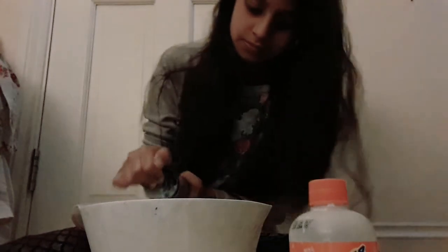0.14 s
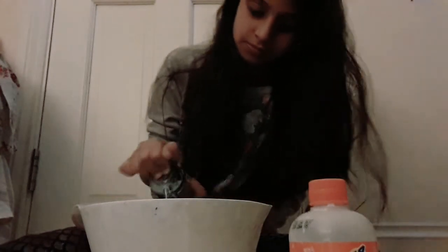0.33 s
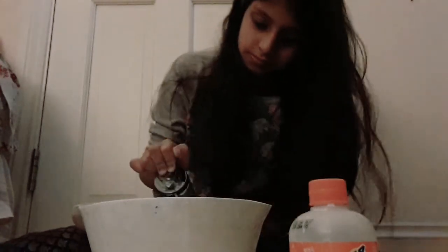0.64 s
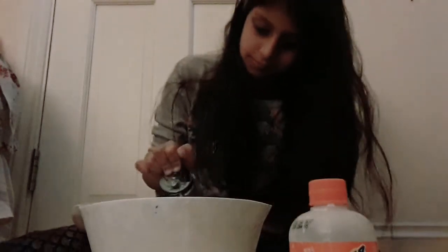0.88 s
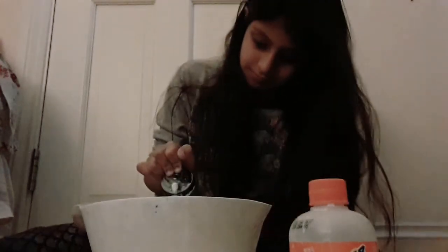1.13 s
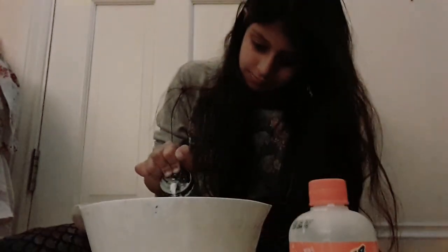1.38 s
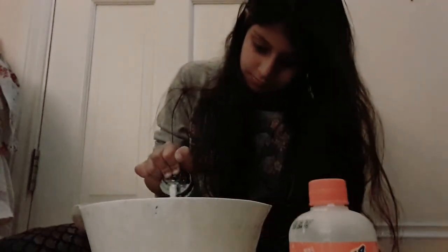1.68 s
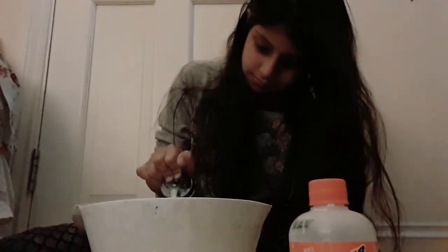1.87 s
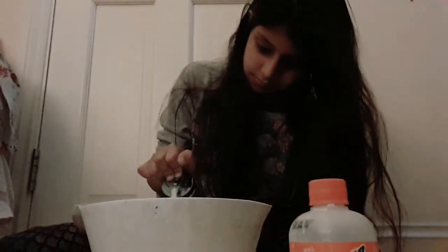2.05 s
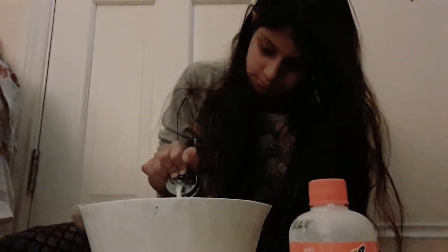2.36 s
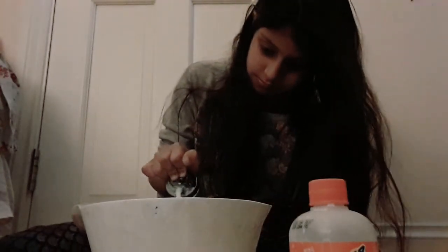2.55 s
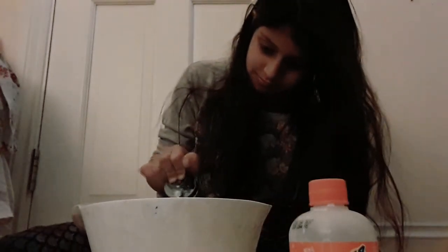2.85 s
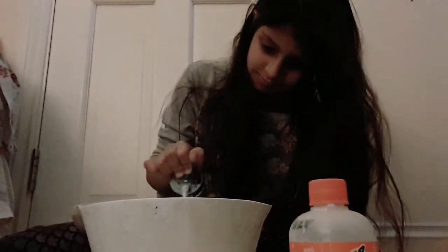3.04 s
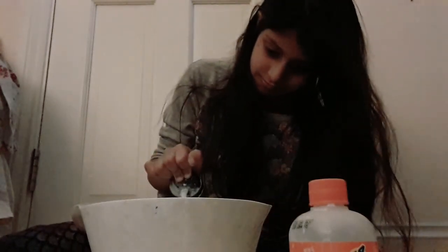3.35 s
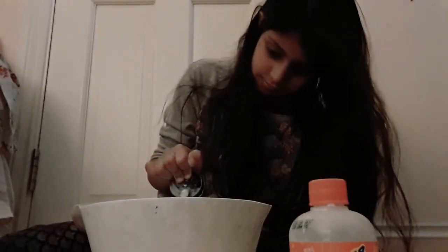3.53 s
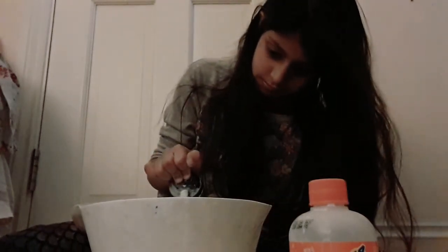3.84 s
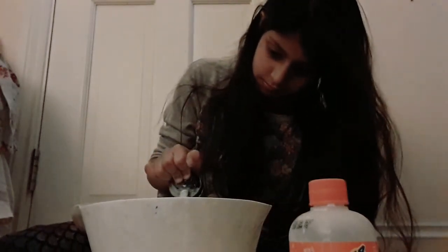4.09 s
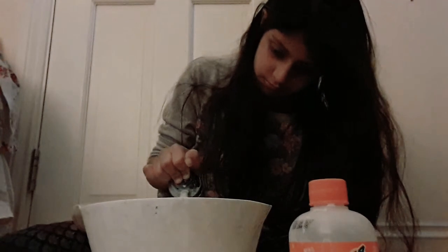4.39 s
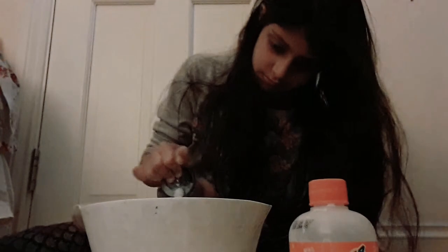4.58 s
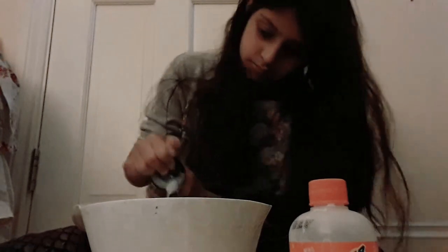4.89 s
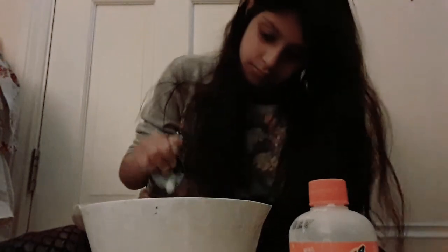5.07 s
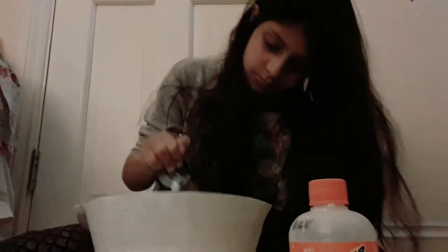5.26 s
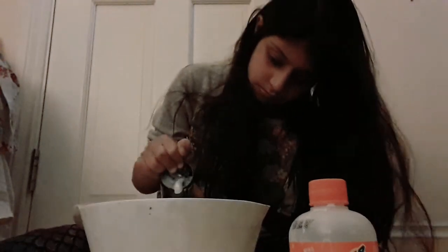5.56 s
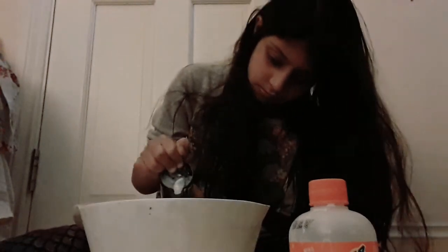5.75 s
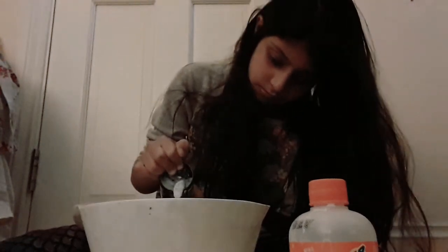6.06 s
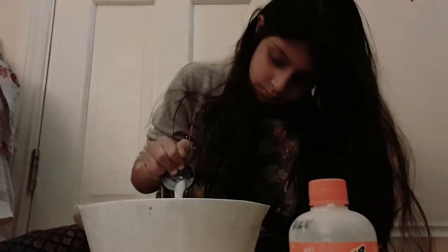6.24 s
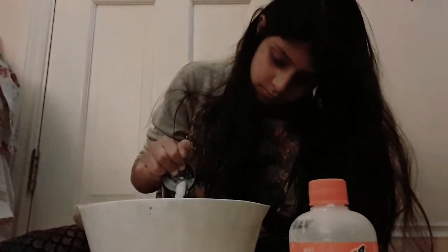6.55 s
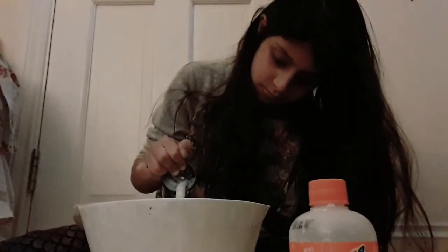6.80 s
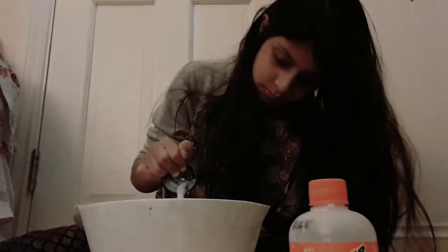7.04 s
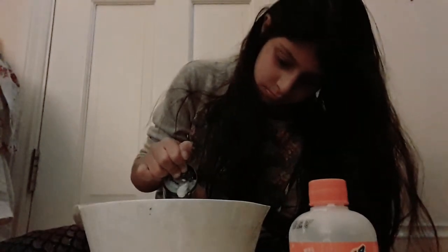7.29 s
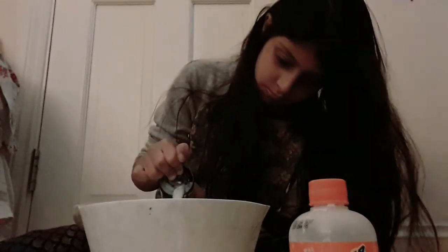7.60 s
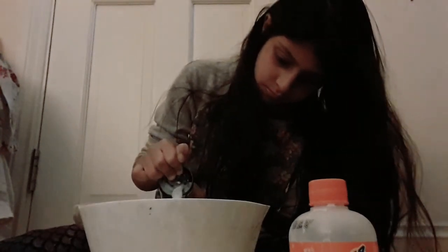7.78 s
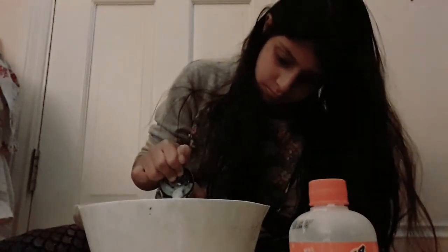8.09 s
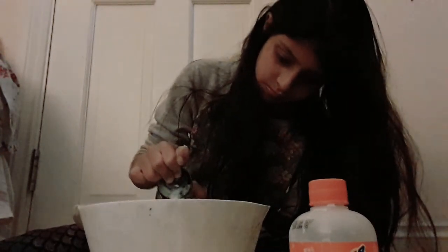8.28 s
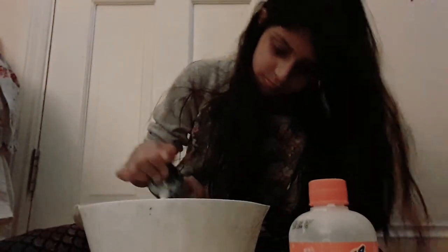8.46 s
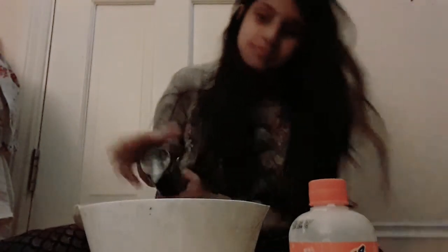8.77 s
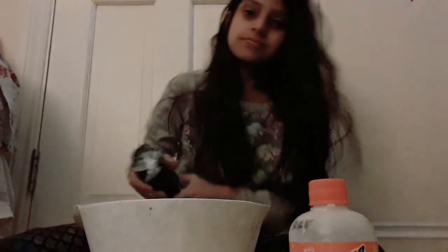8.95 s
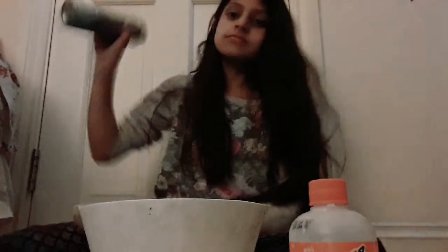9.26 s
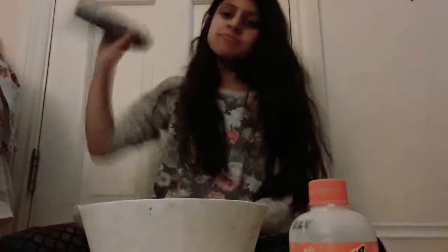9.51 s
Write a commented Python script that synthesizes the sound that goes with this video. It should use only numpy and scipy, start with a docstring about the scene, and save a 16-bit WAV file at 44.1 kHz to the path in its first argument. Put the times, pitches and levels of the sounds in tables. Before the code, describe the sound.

Pressurized foam comes out in bursts, crackling and squeaking at the nozzle while the plastic bowl adds a hollow rush. First a short blast, then a long press turning from bubbly sputter to strong hiss, a quiet gap, hesitant popping that ends in a spurt, tiny puffs, and a last hiss. Faint finger touches and sleeve rubbing follow. Close microphone, short room reflections, quiet wavering drone.

```python
"""Foam sprayed into a bowl

A can of foam is sprayed into a plastic bowl in several bursts, in a small room with a low drone.
Gas pockets burst at the nozzle as rising chirps; their noisy puffs excite resonances of spout and bowl.
As gas breaks through the foam in the stronger presses, free hiss joins the sputter.
Fingers touch the can, and a sleeve rubs briefly early on and again as the can is lifted at the end.
"""
import sys
import numpy as np
from scipy import signal
from scipy.fft import rfft, irfft
from scipy.io import wavfile
from scipy.ndimage import uniform_filter1d

SR = 44100
rng = np.random.default_rng(int(sys.argv[2]) if len(sys.argv) > 2 else 0)


def output_pcm(signal):
    """Save a mono or channel-first signal as 16-bit PCM at the path in sys.argv[1].

    Samples are clipped to [-1, 1] before scaling.
    """
    pcm = np.clip(np.atleast_2d(signal).T, -1, 1) * 32767
    wavfile.write(sys.argv[1], SR, np.round(pcm).astype(np.int16))


N = 424683
TIME = np.arange(N) / SR  # s
FREQ = np.maximum(np.fft.rfftfreq(N, 1 / SR), 1)  # Hz

# Resonances of bowl and can [f/Hz, width/Hz, relative level/dB]
BOWL_MODES = [(255, 110, -6), (335, 70, -3), (555, 75, 4), (960, 220, -16), (1310, 130, -6),
              (1560, 220, -6), (1780, 170, -4.5), (2110, 200, 4.5), (2380, 220, -2), (2980, 420, 3.5)]
# Resonances of the spout [f/Hz, width/Hz, relative level/dB]
SPOUT_MODES = [(4780, 690, -9.5), (5640, 660, -11), (6325, 1600, -9), (7800, 410, -14), (8374, 1860, -0.5),
               (8410, 260, 6), (8770, 870, -1.5), (9200, 380, -10.5)]
# Spectral envelope of the spout's sound [f/Hz, relative level/dB]
SPOUT_SKIRT = [(1500, -32), (4000, -2.5), (6000, 3.5), (8000, 2.5), (9000, -6), (10000, -9.5), (11500, -19),
               (15000, -38)]
# How the bowl colours the pockets [f/Hz, relative level/dB]
POCKET_COLOUR = [(500, -27.5), (1400, -5), (1850, 0), (2150, -5.5), (2620, -4.5), (2930, 3.5), (3300, 1.5),
                 (4400, 5.5), (6500, -4), (9000, -16.5), (11500, -43)]
# Flow leaving the nozzle in each press, five tables [t/s, foam level/dB, gas level/dB]
OPENING_BLAST = [(0.01, -37.5, -24.5), (0.21, -37, -26.4)]
LONG_PRESS = [(0.79, -54, -60), (0.84, -31.5, -43), (0.95, -32, -41.5), (1.12, -31.0, -32.5),
              (1.28, -28, -36.5), (1.38, -31.5, -35), (1.52, -26.5, -31), (1.72, -29, -20),
              (2.02, -30.5, -18.5), (2.48, -35.5, -22)]
SPUTTERING_PRESS = [(3.12, -50, -49.5), (3.21, -55.8, -56), (3.28, -46.5, -55), (3.5, -54, -60.5),
                    (3.88, -45.5, -55), (4.26, -41.5, -42), (4.33, -33.5, -36.5), (4.53, -29, -28.5),
                    (4.67, -43.5, -32)]
TRICKLE = [(5.74, -84, -75), (5.93, -76, -81.5), (6.1, -71.5, -74.1), (6.4, -64, -75), (6.53, -74, -78.5),
           (6.67, -73, -69)]
LAST_PRESS = [(6.99, -72, -71.5), (7.11, -61.5, -69), (7.3, -47, -53.5), (7.51, -36.5, -46.5),
              (7.55, -30.5, -28.5), (7.77, -32.6, -24), (7.93, -37.5, -24), (7.99, -45, -31)]
# Presses of the valve [flow table, t/s when the gas is through the foam, added free hiss/dB,
# aim/dB: + into the bottom of the bowl, - toward its rim]
PRESSES = [(OPENING_BLAST, 0, 19.6, 1.5), (LONG_PRESS, 1.56, 9, 0), (SPUTTERING_PRESS, 4.63, 14, -2.77),
           (TRICKLE, 6.6, 0, 0), (LAST_PRESS, 7.55, 14.6, -1.7)]


def undb(db):
    """Logarithmic level: decibels to amplitude gain."""
    return 10 ** (np.asarray(db) / 20)


def to_db(gain):
    """Logarithmic level: amplitude gain to decibels."""
    return 20 * np.log10(gain)


def unit(x):
    """Power normalisation: scale to rms 1."""
    return x / np.sqrt(np.mean(x ** 2))


def even(x, span_s=.06):
    """Envelope normalisation: hold the short-term rms at 1, leaving the fast grain."""
    power = uniform_filter1d(x ** 2, int(span_s * SR))
    return x / np.sqrt(np.abs(power) + 1e-12)


def walk(rate):
    """Random modulation: levels held for 1 / rate s and slewed, spread 1."""
    hold = int(SR / rate)
    levels = np.repeat(rng.standard_normal(N // hold + 1), hold)
    return unit(uniform_filter1d(levels, hold)[:N])


def hump(middle_s, half_s):
    """Gaussian envelope: a smooth rise and fall in time, peak 1."""
    return np.exp(-np.minimum(((TIME - middle_s) / half_s) ** 2, 50))


def slope(points):
    """Spectral envelope: gain interpolated in dB over log frequency through (f/Hz, level/dB)."""
    hz, db = np.transpose(points)
    return undb(np.interp(np.log(FREQ), np.log(hz), db))


def resonances(modes):
    """Causal modal response: powers of damped modes add; minimum phase makes them ring after the push."""
    power = 0
    for hz, width, db in modes:
        detuning = (FREQ ** 2 - hz ** 2) / (FREQ * width)
        power = power + undb(db) ** 2 / (1 + detuning ** 2) ** 1.61
    # folding the cepstrum of the power gives the minimum-phase amplitude
    cepstrum = irfft(np.log(power + 1e-9), N)
    cepstrum[0] /= 2
    cepstrum[N // 2:] = 0
    return np.exp(rfft(cepstrum))


def shape(x, response):
    """Linear filtering: multiply the spectrum by a frequency response."""
    return irfft(rfft(x) * response, N)


def place(times, grains):
    """Superposition: add up short sounds, one a row, at their times."""
    index = (times * SR).astype(int)[:, None] + np.arange(grains.shape[1])
    return np.bincount(index.ravel(), grains.ravel(), N)[:N]


def spray(count=6500, scatter_db=4.0, crackle_db=4.5, clump_db=1.0, pitch_spread=0.135):
    """Granular source and resonators: random clumped bursts over a gas stream excite spout and bowl."""
    # A weak flow squeezes out few pockets, slowly [pocket level/dB, rate/(1/s), ring time/s]
    bubbling_law = [(-61, 92, 0.0015), (-46.5, 210, 0.003), (-31, 520, 0.00076), (-22.5, 600, 0.00043)]
    # Steady gas beside the crackle; a trickle fizzes finely, a sputter is all bursts
    # [hiss level/dB, relative stream level/dB]
    stream_law = [(-103, -3.5), (-91.5, -13.5), (-61.5, -7), (-35.5, 0)]
    # Spectrum of the free hiss [f/Hz, relative level/dB]
    gas_spectrum = [(1000, -36), (3000, 0.5), (6000, -1.5), (9300, 11.5), (10500, 5), (12000, 2.5),
                    (15500, -4.5)]

    bottom, rim, pocket, fizz, gas = nozzle()
    surge = undb(clump_db * np.clip(walk(85), -2, 2))

    # candidate bursts, thinned to the rate of the flow
    times = rng.uniform(0, N / SR, count)
    chance = np.clip(rng.standard_normal((count, 3)), -2, 2)
    strength_db = to_db(np.interp(times, TIME, pocket))
    steps_db, rates, rings = np.transpose(bubbling_law)
    probability = np.interp(strength_db, steps_db, rates) * N / SR / count
    bursts = (rng.random(count) < probability)[:, None]

    fizz_db = to_db(np.interp(times, TIME, fizz))
    hz = pocket_pitch(times, fizz_db) * np.exp(pitch_spread * chance[:, 1])
    ring_s = np.interp(strength_db, steps_db, rings)
    grains = bursts * undb(scatter_db * chance[:, :1]) * chirps(hz, ring_s, glide=.08, rough=0.65)
    bubbling = even(shape(surge * place(times, grains), slope(POCKET_COLOUR)))

    burst_gas = bursts * undb(crackle_db * chance[:, 2:]) * puffs(count, decay_s=0.0014)
    crackle = unit(place(times, burst_gas))
    # free gas runs steadily between the bursts
    stream = undb(np.interp(to_db(gas), *np.transpose(stream_law))) * rng.standard_normal(N)
    jet = surge * (crackle + stream)

    bowl = even(shape(jet + undb(-8.5) * rng.standard_normal(N), resonances(BOWL_MODES)))
    spout = even(shape(jet, resonances(SPOUT_MODES) * slope(SPOUT_SKIRT)))
    hiss = even(shape(jet + undb(1.0) * rng.standard_normal(N), slope(gas_spectrum)))
    # the bottom carries the low modes, the rim the rest
    deep = shape(bowl, slope([(1000, 1.5), (1300, -29)]))
    rush = bottom * deep + rim * (bowl - deep)
    foam = undb(-1.0) * pocket * bubbling
    return undb(4.0) * rush + foam + undb(1.5) * fizz * spout + undb(9) * gas * hiss


def nozzle():
    """Superposed flows: five gains over time, summed over spurts and presses; hiss joins at breakthrough."""
    # Brief spurts from a dab on the valve or a slug of gas
    # [middle t/s, half length/s, foam level/dB, gas level/dB, added hiss/dB, aim/dB]
    spurts = [(0.693, 0.031, -48.5, -33, 9, -2), (1.331, 0.011, -57, -25.5, 1, -2),
              (2.993, 0.016, -45, -62.5, 0, 2), (3.02, 0.014, -51, -34.5, 7, -0.5),
              (3.074, 0.027, -56, -37, 0, 1), (4.293, 0.006, -34, -39, -0.5, -2),
              (5.402, 0.028, -48.5, -64, 11, -9), (5.495, 0.0274, -45, -46, 2, -9),
              (5.601, 0.027, -55, -40, 13, -4.5)]
    breakthrough_s = 0.017  # time that the gas takes to clear its way

    gains = sum(outflow(*flow) * hump(at_s, half_s) for at_s, half_s, *flow in spurts)
    for flow, through_s, dry_db, aim_db in PRESSES:
        times, foam_db, gas_db = np.transpose(flow)
        dryness = np.clip(1 + (TIME - through_s) / breakthrough_s, 0, 1)
        foam_now_db = np.interp(TIME, times, foam_db)
        gas_now_db = np.interp(TIME, times, gas_db)
        held = outflow(foam_now_db, gas_now_db, dryness * dry_db, aim_db)
        gains = gains + held * valve(times[0], times[-1])
    return gains


def outflow(foam_db, gas_db, dry_db, aim_db):
    """Flow-noise law: gains of bowl bottom, rim, pockets, spout fizz and free hiss from foam and gas flow."""
    # Bowl rush levels off as gas flow grows, hiss rises faster
    # [gas level/dB, bottom level/dB, rim level/dB, hiss level/dB]
    gas_law = [(-79.5, -77, -82, -106), (-58.5, -53.5, -56, -98.5), (-43, -50, -53.5, -83),
               (-35.5, -46.5, -47, -70), (-23.5, -42, -42, -49.5), (-16.5, -41.5, -43.5, -47.5)]
    rim_trade = 0.25  # dB that the rim gains per dB of aim taken from the bottom
    dry_spout_loss = 0.18  # dB of spout fizz lost per dB of added free hiss

    steps_db, *laws = np.transpose(gas_law)
    bottom_db, rim_db, hiss_db = (np.interp(gas_db, steps_db, law) for law in laws)
    return undb(np.vstack([
        bottom_db + aim_db,
        rim_db - rim_trade * aim_db,
        foam_db,
        gas_db - dry_spout_loss * dry_db,
        hiss_db + dry_db]))


def valve(start_s, end_s):
    """Exponential gating: the valve opens, holds and shuts; fresh foam then fizzes with a slow decay."""
    open_db_per_s, close_db_per_s = 419.5, 478
    settle_db, settle_db_per_s = -50.5, 24.5
    before, after = np.maximum(start_s - TIME, 0), np.maximum(TIME - end_s, 0)
    shutting = undb(-close_db_per_s * after)
    settling = undb(settle_db - settle_db_per_s * after)
    return undb(-open_db_per_s * before) * (shutting + settling)


def pocket_pitch(times, gas_db):
    """Size sets pitch: it varies with gas flow and rises at breakthrough, except while the size wanders."""
    # Base pitch of pockets against the gas flow [gas level/dB, f/Hz]
    flow_pitch = [(-56.5, 2980), (-42.5, 3177), (-34, 3307), (-25, 3150), (-18.5, 3700)]
    # Wandering pocket size early in the long press [t/s, f/Hz]
    wander = [(0.8, 2880), (0.87, 3800), (1.07, 3200), (1.28, 3640), (1.38, 3400), (1.52, 3150),
              (1.62, 4500), (1.72, 3470)]
    squeeze_hz, squeeze_s = 850, 0.088  # pockets are squeezed smaller around a breakthrough

    squeeze = sum(hump(through_s, squeeze_s) for _, through_s, _, _ in PRESSES)
    hz = np.interp(gas_db, *np.transpose(flow_pitch)) + squeeze_hz * np.interp(times, TIME, squeeze)
    wander_s, wander_hz = np.transpose(wander)
    wandering = (times > wander_s[0]) & (times < wander_s[-1])
    return np.where(wandering, np.interp(times, wander_s, wander_hz), hz)


def chirps(hz, ring_s, glide, rough, size=512):
    """Damped bubble oscillation: a pocket swells and rings, rising in pitch; its tearing skin adds noise."""
    age = np.arange(size) / SR / np.reshape(ring_s, (-1, 1))  # in ring times
    pitch = hz[:, None] * (1 + glide * np.tanh(age / 2 - 1))
    tone = np.sin(2 * np.pi * np.cumsum(pitch, axis=1) / SR)
    swell = (age * np.exp(1 - age)) ** 2
    return swell * (tone + rough * rng.standard_normal(tone.shape))


def puffs(count, decay_s, size=600):
    """Turbulence noise: short bursts of gas with exponential decay, one a row."""
    return rng.standard_normal((count, size)) * np.exp(-np.arange(size) / SR / decay_s)


def spits():
    """Impulsive excitation: a big pocket chirps, and the gas behind it rings the spout and the bowl."""
    # Single loud spits [t/s, relative level/dB, pocket f/Hz, relative spout ring level/dB]
    loud_spits = [(0.7044, -22.5, 5100, -2), (0.8225, -22, 3100, -32), (0.851, -9, 3700, -11),
                  (0.8674, -18, 3930, -18), (0.917, -18, 3800, -22), (1.0183, -10.5, 3640, -18),
                  (1.045, -9, 3580, -10.5), (1.079, -9.5, 3460, -14), (1.1508, -14.5, 3760, -22),
                  (1.1718, -16, 3460, -11.5), (1.3185, -4, 3900, 5), (1.3306, -12, 3500, -3),
                  (1.3528, -8.5, 3520, -3.5), (1.4214, -8, 3480, -15.5), (1.6152, -5.5, 5300, -12.5),
                  (1.6272, -4.5, 4530, -9), (2.002, -5, 3820, -7), (2.0647, -5.5, 3970, -0.5),
                  (2.2027, -9, 3570, -1), (2.4422, -7, 3360, -3), (2.981, -28.5, 2910, -34),
                  (3.0052, -22.5, 3820, -17), (3.0618, -14, 4800, 9), (3.192, -36, 5030, -22),
                  (3.2439, -14, 2930, -25), (3.295, -31, 2960, -17), (3.3635, -30, 3000, -34),
                  (3.3915, -31.5, 3160, -22), (3.7462, -26, 2950, -35), (3.9506, -25.5, 4950, -20),
                  (3.9992, -19, 3140, -9), (4.0384, -22, 3080, -1), (4.0907, -15, 5050, -12.5),
                  (4.149, -15.5, 2970, -8), (4.1923, -10.5, 3770, -6), (4.2863, -13.5, 3820, -33),
                  (4.321, -16, 3870, -14), (4.3525, -13, 3720, 2), (4.3835, -10.5, 3000, -30.5),
                  (4.546, -7.5, 4020, -10), (4.6259, -8, 4660, 6.5), (5.4654, -26, 3450, -37),
                  (5.5707, -25, 2980, -13), (6.0641, -41, 2890, -22), (6.1602, -37.5, 2880, -25),
                  (6.3599, -35, 3110, -36), (6.385, -39, 3120, -12), (7.162, -22, 3020, -18),
                  (7.2474, -30, 2960, -29), (7.4436, -16, 3030, -33), (7.5296, -13.5, 4400, -14),
                  (7.5587, -14, 4900, -15), (7.6148, -9.5, 2880, -20), (7.8587, -12, 2820, -7)]

    times, level_db, hz, spout_db = np.transpose(loud_spits)
    ring = undb(spout_db + 8.5)
    strength = undb(level_db) / np.hypot(1, ring)  # shared between pocket and spout
    ring_s = np.interp(level_db, [-30, -10], [.001, .00065])  # big ones empty faster

    grains = strength[:, None] * chirps(hz, ring_s, glide=0.22, rough=0.45)
    pockets = shape(place(times + .0003, grains), slope(POCKET_COLOUR))
    burst = puffs(len(times), decay_s=0.0022)
    gas = place(times + .0005, (strength * ring)[:, None] * burst)
    spout = shape(gas, resonances(SPOUT_MODES) * slope(SPOUT_SKIRT))
    push = place(times + 0.0012, strength[:, None] * burst)
    knock = shape(push, resonances(BOWL_MODES) * slope([(500, -18.0), (2000, -3.0)]))
    return undb(-5.0) * pockets + undb(3.5) * spout + undb(-35) * gas + undb(-11) * knock


def plop(at_s=.2125, level_db=-26, low_hz=280, high_hz=570, decay_s=0.0017):
    """Two-mode impact: a blob of foam knocks the bowl as the first burst stops."""
    t = np.maximum(TIME - at_s, 0)
    swell = t / decay_s * np.exp(1 - t / decay_s)
    tones = np.sin(2 * np.pi * low_hz * t) + np.sin(2 * np.pi * high_hz * t)
    return undb(level_db) * swell * tones


def taps(hz=1200, width_hz=700, decay_s=0.014):
    """Damped resonance under noise excitation: soft, dull touches on the side of the can."""
    # Fingers shifting on the can [t/s, relative level/dB]
    touches = [(2.633, -48.5), (5.634, -49), (6.385, -52.5), (6.635, -54), (8.292, -62.5), (8.64, -57)]
    times, level_db = np.transpose(touches)
    touch = place(times, undb(level_db)[:, None] * puffs(len(times), decay_s, size=2400))
    return undb(10) * shape(touch, resonances([(hz, width_hz, 0)]))


def sleeve(rough_db=1.5):
    """Friction noise: cloth rubs softly and unevenly, as randomly modulated filtered noise."""
    # Strokes of the sleeve as the hand moves [middle t/s, half length/s, relative level/dB]
    rubs = [(2.643, 0.048, -57), (8.345, 0.08, -69.5), (8.743, 0.15, -62), (9.08, 0.087, -66.5)]
    # Spectrum of the cloth [f/Hz, relative level/dB]
    cloth = [(300, 5.5), (900, -2.5), (1400, 1), (2400, -0.5), (3500, -13.5), (5500, -10.5), (6900, -1.5),
             (7400, 2.5), (8400, 13), (9300, 0.5), (10500, -16), (12000, -26)]
    rub = rng.standard_normal(N) * undb(rough_db * walk(150))
    strokes = sum(undb(db) * hump(at_s, half_s) for at_s, half_s, db in rubs)
    return undb(0.5) * strokes * unit(shape(rub, slope(cloth)))


def room(x, t60_s=0.21, tail_db=-6.5, early_db=-7, early_s=0.0038, size=16000):
    """Reverberation: bright, quick reflections from bowl and floor, then the short tail of close walls."""
    t = np.arange(size) / SR
    early = rng.standard_normal(size) * np.exp(-t / early_s) * (t > .001)
    tail = rng.standard_normal(size) * np.exp(-np.log(1000) * t / t60_s) * (t > .005)
    early = signal.sosfilt(signal.butter(2, 2500, "high", fs=SR, output="sos"), early)
    response = undb(early_db) * early / np.linalg.norm(early) + undb(tail_db) * tail / np.linalg.norm(tail)
    response[0] = 1  # direct sound
    return signal.fftconvolve(x, response / np.linalg.norm(response))[:N]


def background():
    """Stationary filtered noise: quiet room air with a faint hiss, and narrow bands as a wavering drone."""
    # Spectrum of the room air [f/Hz, relative level/dB]
    air_spectrum = [(25, -2.5), (50, -2), (110, -1), (250, -4), (500, -13.5), (1000, -22.5), (2200, -26.5),
                    (4300, -38), (6000, -40.5), (7300, -35.5), (8400, -25), (9600, -42), (11000, -48.5),
                    (15500, -46.5)]
    # Low drone in the room [f/Hz, width/Hz, relative level/dB]
    drone_modes = [(106, 7.3, 1.5), (180.8, 17, -2.5), (244.5, 30, -9.5)]
    # Strength of the low drone [t/s, level/dB]
    drone_level = [(0, -70), (2.8, -71.5), (3.6, -64.5), (5.8, -65), (6.15, -61.5), (6.7, -65.5),
                   (8.4, -62), (9.6, -70)]
    air_db = -62.5
    air = unit(shape(rng.standard_normal(N), slope(air_spectrum))) * undb(air_db + 0.55 * walk(3))
    drone = unit(shape(rng.standard_normal(N), resonances(drone_modes)))
    return air + drone * undb(np.interp(TIME, *np.transpose(drone_level)))


def scene():
    """Linear superposition: all sources sound in one small room; the knock is close and partly dry."""
    knock = plop()
    sources = spray() + spits() + taps() + sleeve() + undb(-6.5) * knock
    return (room(sources) + undb(-5.0) * knock + background())[None]


def record(dry):
    """Saturation and band limiting: the very highest peaks are rounded and the top is cut."""
    top_hz = 15450
    rounded = dry / (1 + (dry / .72) ** 6) ** (1 / 6)
    return signal.sosfilt(signal.ellip(10, .2, 80, top_hz, fs=SR, output="sos"), rounded)


dry = scene()
out = record(dry)
output_pcm(out)
```